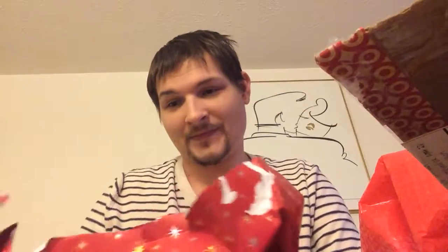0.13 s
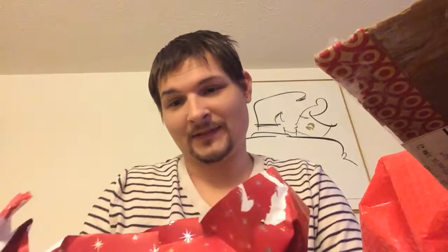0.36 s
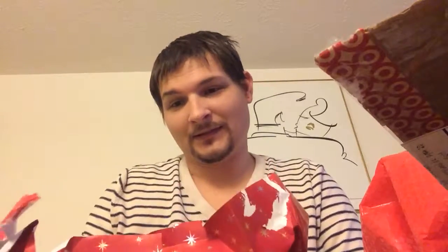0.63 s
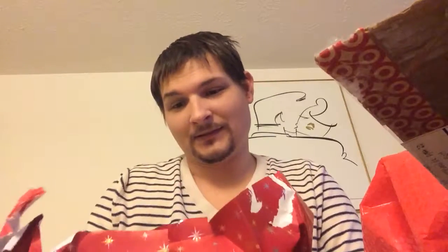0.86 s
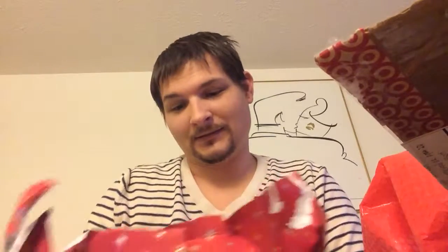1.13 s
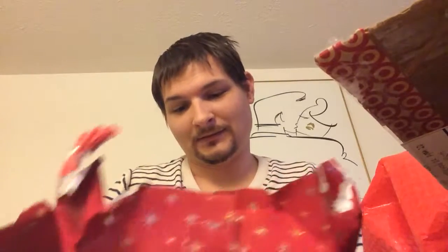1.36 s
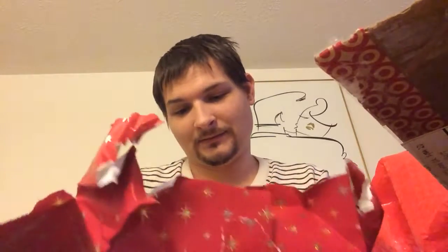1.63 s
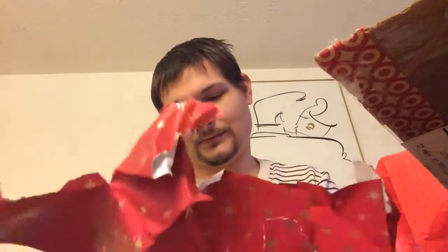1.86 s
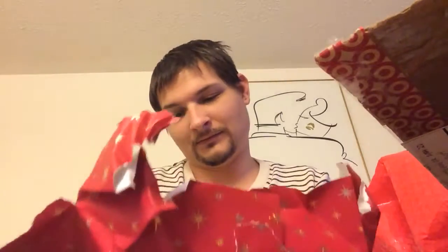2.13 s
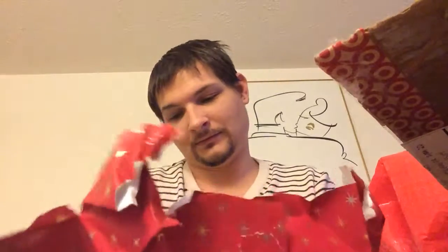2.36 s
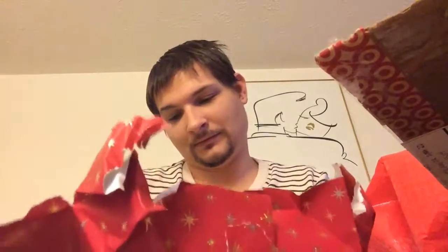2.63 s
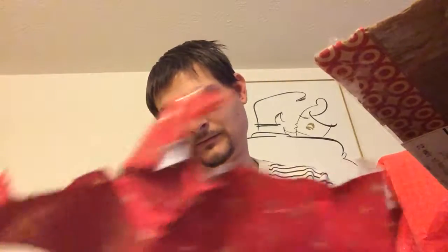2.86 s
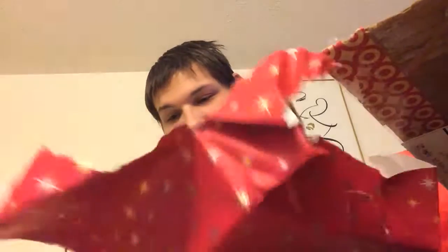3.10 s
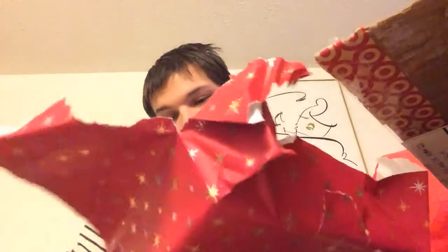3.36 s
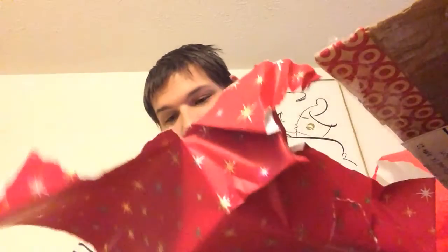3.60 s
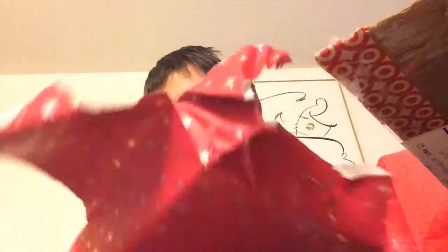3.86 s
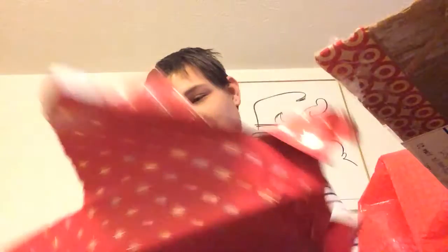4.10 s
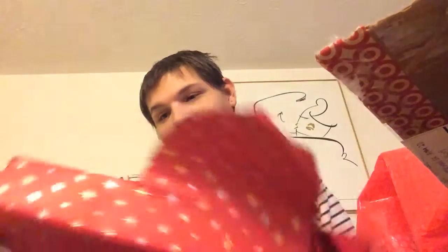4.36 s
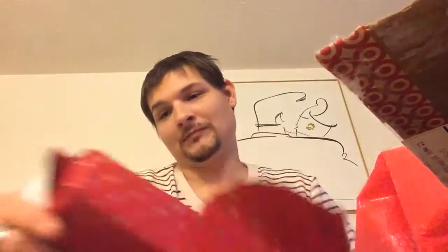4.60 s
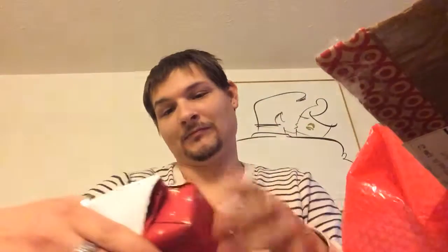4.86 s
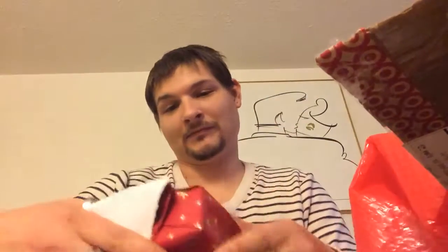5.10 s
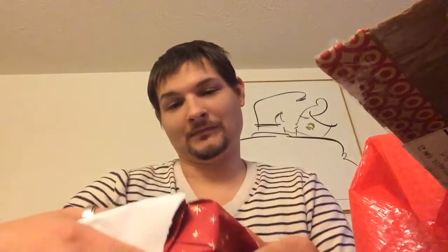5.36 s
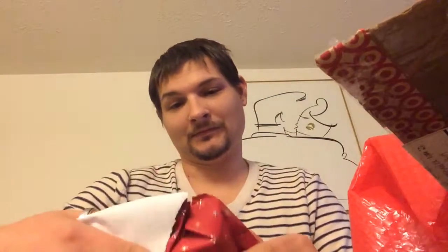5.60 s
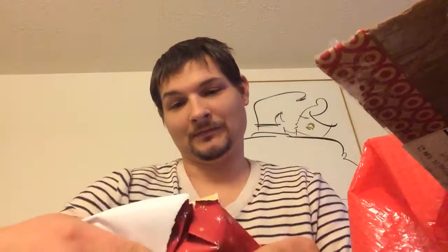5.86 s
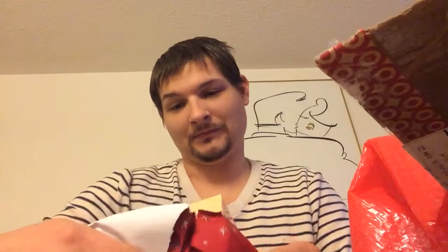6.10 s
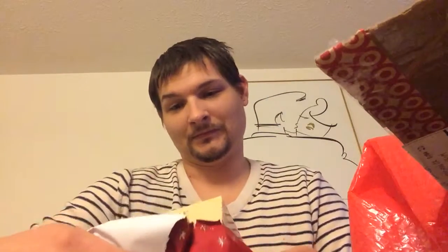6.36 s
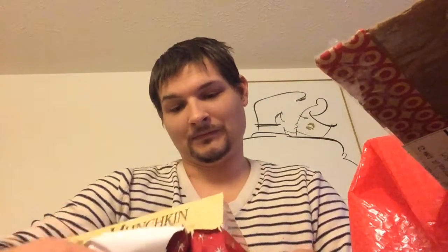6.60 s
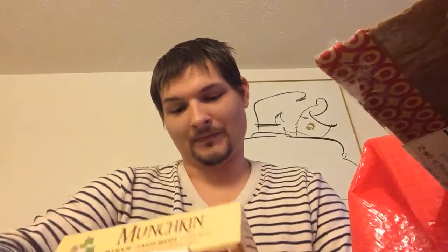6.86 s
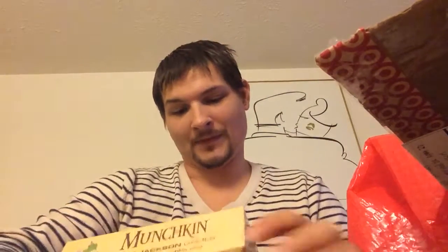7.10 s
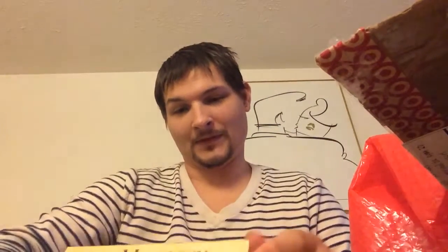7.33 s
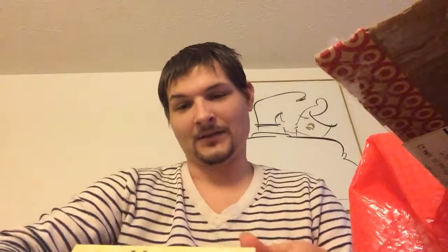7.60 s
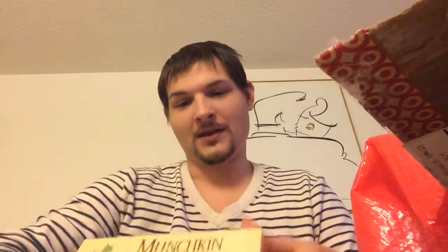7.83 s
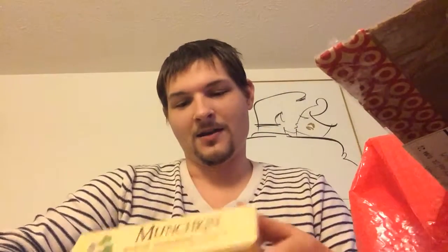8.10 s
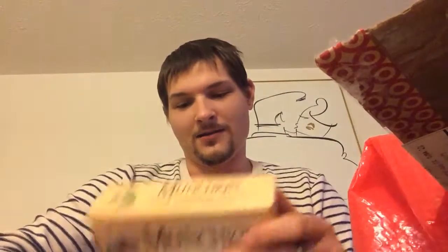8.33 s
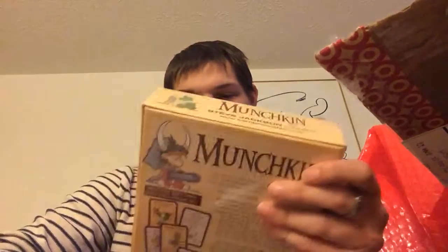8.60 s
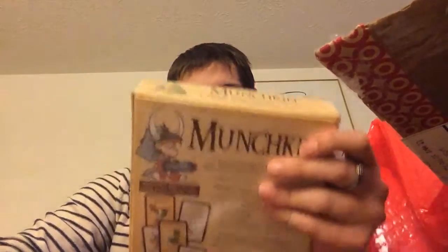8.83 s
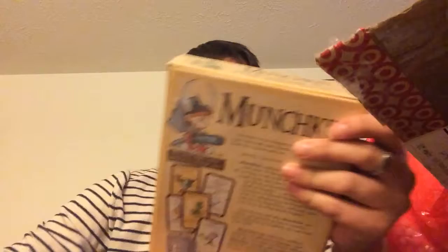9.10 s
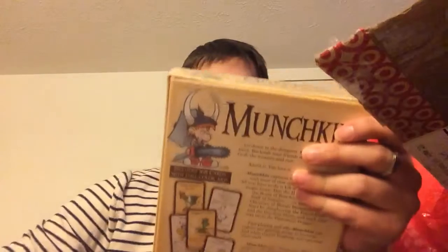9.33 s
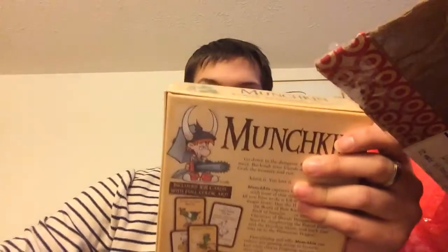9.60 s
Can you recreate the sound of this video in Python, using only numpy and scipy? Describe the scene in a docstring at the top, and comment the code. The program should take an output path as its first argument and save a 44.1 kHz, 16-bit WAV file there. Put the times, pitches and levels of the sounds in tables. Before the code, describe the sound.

Stiff wrapping paper handled right at the microphone, indoors with hardly any echo. Light rubbing on cardboard leads to a bright crack and a fibrous tear, a brief hush, then another tear with a sudden pop. Irregular snaps and crinkles thin out midway and return ever denser, with hollow box taps, a violent cluster of bursting folds, a short dip, and a loud crumpling finish.

```python
"""Hands rip, slide and crumple wrapping paper around a cardboard box, close to a microphone in a small soft room.
From the start a fine rustle of noise puffs, box knocks of a few cycles and small creases; soon slips along the box.
Then creases snap, each a noise crack with a ringing panel; fibres click through two long tears (from 1 and 2.8 s).
From 2.9 s on, flaps puff air and big folds burst as damped pushes; snaps crowd towards the end."""
import sys
import numpy as np
from scipy import signal
from scipy.io import wavfile
from scipy.ndimage import uniform_filter1d

SR = 44100
rng = np.random.default_rng(int(sys.argv[2]) if len(sys.argv) > 2 else 0)


def volts_from_db(level):
    """Convert decibel levels to linear amplitude ratios."""
    exponent = np.asarray(level, float) / 20
    return 10 ** exponent


def wav_out(sig):
    """Save sig, one row per channel (or a flat mono array), as 16-bit PCM at SR to the path in sys.argv[1]."""
    wavfile.write(sys.argv[1], SR, np.round(np.clip(np.atleast_2d(sig).T, -1, 1) * 32767).astype(np.int16))


N = 428211

# Spectrum of paper fibres and cracks. Each row: frequency in Hz, level in dB.
FIBRE_SPECTRUM = [(2500, -8), (3500, -3), (5000, -2), (7800, -2), (8400, -6), (14500, -5), (15400, -12.5),
                  (15750, -51)]


def evened(x):
    """Scales to rms 1."""
    return x / np.sqrt(np.mean(x ** 2) + 1e-20)


def peaked(x):
    """Scales to peak 1."""
    return x / np.abs(x).max()


def smoothed(x, width, axis=-1):
    """Two running means in a row."""
    return uniform_filter1d(uniform_filter1d(x, width, axis), width, axis)


def add(mix, start_s, sound):
    """Mixes a sound in at a time."""
    part = mix[round(start_s * SR):][:len(sound)]
    part += sound[:len(part)]


def mixed(*sounds):
    """Sums sounds of different lengths from their starts."""
    out = np.zeros(max(map(len, sounds)))
    for sound in sounds:
        add(out, 0, sound)
    return out


def colour(points, size=2048):
    """Causal (minimum-phase) impulse response of a spectrum given in Hz and dB."""
    hz, db = np.transpose(points)
    f = np.abs(np.fft.fftfreq(size, 1 / SR)) + 1
    log_gain = np.log(volts_from_db(np.interp(np.log(f), np.log(hz), db)))
    return np.fft.ifft(np.exp(np.conj(signal.hilbert(log_gain)))).real[:size // 2]


def ring(hz, cycles, phase_turns):
    """A mode that swells with a quarter-cycle time constant and falls 60 dB in the given cycles."""
    turns = np.arange(1, 2 + cycles * SR / hz) * hz / SR
    envelope = volts_from_db(-60 * turns / cycles) * (1 - np.exp(-turns / 0.25))
    return envelope * np.sin(2 * np.pi * (turns + phase_turns))


def effort():
    """Levels of fizz, panels and box in dB: every pull rises fast, sags while it lasts and dies away over the bed."""
    # Quiet handling that never stops. Each row: time in s, fibre fizz, paper panels, box and hands in dB.
    bed = [(0, -57, -45, -43.5), (.08, -68, -66, -43.5), (.3, -71.5, -67, -54), (.55, -72, -68, -62.5),
           (.8, -48, -50, -58), (1.768, -44, -51.5, -54.5), (1.95, -84, -72.5, -65),
           (2.65, -59.5, -61, -59), (3.2, -55, -55.5, -52), (3.45, -60.5, -58.5, -63),
           (4.2, -56.5, -57, -51.5), (4.5, -68.5, -63, -61), (4.9, -58.5, -59, -57.5),
           (5.5, -68, -60.5, -56), (6.05, -62, -57.5, -60), (6.55, -63, -55.5, -56.5),
           (7.1, -62, -56.5, -55.5), (8.1, -51, -53, -58), (8.5, -72, -68, -78), (8.8, -60, -54, -58.5),
           (9.2, -48.5, -45, -41.5), (9.71, -51.5, -65, -65)]
    # Pulls of the hands, each a rip, slide or squeeze.
    # Each row: start in s, length in s, fizz, panels and box in dB.
    pulls = [(0.681, 0.054, -29, -37, -36.5), (0.856, 0.24, -42.5, -62, -60), (.975, 0.2, -33, -34.5, -39),
             (1.22, 0.17, -33, -34, -36.5), (1.457, 0.084, -45.5, -42, -41.5),
             (1.614, 0.064, -36.5, -49.5, -56), (1.658, 0.068, -30.5, -36, -39.5),
             (2.406, 0.02, -41, -50, -47), (2.722, 0.11, -34.5, -56, -56),
             (2.828, 0.067, -32.5, -34, -42.5), (2.905, 0.082, -35, -32, -64),
             (3.007, .1, -34.5, -38.5, -48.5), (3.471, 0.22, -52, -48.5, -54),
             (3.837, 0.018, -57, -46, -57), (3.97, 0.18, -49.5, -50, -62), (4.215, 0.063, -49, -54, -63),
             (4.713, 0.1, -55, -52.5, -45.5), (5.01, 0.057, -58, -47.5, -44.5),
             (5.563, 0.047, -44.5, -49.5, -63), (5.664, 0.037, -41, -40, -49),
             (5.775, .04, -44.5, -47.5, -51), (6.058, 0.038, -46.5, -43, -44.5),
             (6.42, 0.019, -56, -49.5, -53), (6.677, 0.17, -54, -39, -39), (6.84, 0.14, -55, -45.5, -46.5),
             (7.212, 0.051, -42, -43, -40.5), (7.303, 0.046, -43, -38, -44), (7.437, 0.1, -55, -50.5, -55),
             (7.558, 0.037, -46, -44, -52), (7.779, 0.047, -45, -40.5, -49),
             (7.878, 0.094, -47, -38.5, -39.5), (8.113, 0.05, -44, -37, -41),
             (8.217, 0.21, -35.5, -40, -42.5), (8.566, 0.025, -61, -49, -73), (8.888, 0.032, -46, -50, -52),
             (9.09, 0.13, -53, -37.5, -40), (9.216, .11, -41.5, -31.5, -31.5),
             (9.369, 0.062, -40, -33.5, -36), (9.482, 0.053, -35, -30, -35.5),
             (9.581, 0.057, -33.5, -28, -32)]
    rise_db_per_s, release_db_per_s = (900, 702.5, 406), (378, 291, 257)  # fizz, panels, box
    sag_db = 4  # over a pull
    t = np.arange(N) / SR
    s, *levels = np.transpose(bed)
    power = np.array([volts_from_db(2 * np.interp(t, s, level)) for level in levels])
    for start, length, *peak_db in pulls:
        now = slice(round(max(start - .1, 0) * SR), round((start + length + .4) * SR))
        u = t[now] - start
        slowing = 1 + 2.3 * max(length - .07, 0)  # long pulls gather more slowly
        rise_db = np.outer(rise_db_per_s, np.minimum(u - .01, 0)) / slowing
        fall_db = np.outer(release_db_per_s, np.maximum(u - length, 0))
        shape_db = rise_db - sag_db * np.clip(u / length, 0, 1) - fall_db
        power[:, now] += volts_from_db(2 * (np.array(peak_db)[:, None] + shape_db))
    return 10 * np.log10(power)


def patchy(x, patch_db):
    """The crumpling sheet keeps changing which pitches it favours."""
    z = signal.stft(x, nperseg=512)[2]
    field = uniform_filter1d(uniform_filter1d(rng.standard_normal(z.shape), 9, 0), 12, 1)
    return signal.istft(z * volts_from_db(patch_db * evened(field)), nperseg=512)[1][:N]


def grains(spectrum, size, t60_s, patch_db=3.5, count=32):
    """Every grain is one of a few short dying noise puffs, so that each has its own colour."""
    t = np.arange(600) / SR
    kind = rng.integers(0, count, N)
    puffs = rng.standard_normal((count, len(t))) * volts_from_db(-60 * t / t60_s)
    x = sum(signal.oaconvolve(size * (kind == k), puffs[k])[:N] for k in range(count))
    x = signal.oaconvolve(x, colour(spectrum))[:N]
    x = patchy(x, patch_db)
    return x / np.sqrt(smoothed(x ** 2, 2500) + 1e-12)  # local rms near 1


def rustle(fizz_db, panel_db, box_db):
    """One clumped stream of tiny buckles drives fibres, panels and box, each adding some chance of its own."""
    # Spectra of loose panels, box and low rumble. Each row: frequency in Hz, level in dB.
    panel_spectrum = [(400, -47), (750, -14.5), (1300, -8.5), (2200, -10.5), (3500, -17.5), (5000, -55)]
    box_spectrum = [(50, -24.5), (110, -5.5), (230, 3), (450, 2.5), (750, -5), (1100, -46.5)]
    rumble_spectrum = [(20, -10), (35, -1.5), (60, -6.5), (120, -3.5), (300, -4.5), (1000, -18.5),
                       (4000, -31), (15000, -47.5), (16000, -75.5)]
    grains_per_s, clump_db = 1700, 3.5  # clump_db at a spread of 4 dB
    spread_db = np.clip(0.15 * (-34 - fizz_db) + 0.36, 0, 3)  # fainter fizz has more uneven grains
    # -1 taut and bright, 1 slack and dull
    slack = np.clip(0.31 + 0.06 * (box_db - panel_db), -1, 1)
    clumps = evened(smoothed(rng.standard_normal(N), 300))
    luck = np.minimum(rng.exponential(1, (3, N)), 5)
    hit = (rng.random(N) < grains_per_s / SR) * volts_from_db(clump_db * clumps * spread_db / 4)

    fizz = grains(FIBRE_SPECTRUM, hit * volts_from_db(spread_db * luck[0]), t60_s=0.007, patch_db=1.2, count=56)
    panel_luck = np.maximum(1.3 * luck[0], 0.29 * luck[1])
    panels = grains(panel_spectrum, hit * volts_from_db(spread_db * panel_luck), t60_s=0.017)
    # an 8-sample echo tilts the colour
    panels = (panels + slack * np.roll(panels, 8)) / np.sqrt(1 + slack ** 2)
    box_luck = np.maximum(0.19 * luck[0], 0.83 * luck[2])
    box = grains(box_spectrum, hit * volts_from_db(spread_db * box_luck), t60_s=0.017)
    rumble = evened(signal.oaconvolve(rng.standard_normal(N), colour(rumble_spectrum, size=8192))[:N])
    rumble_db = -57 + 0.06 * (box_db + 43.5)  # the table under the microphone shakes with the box
    return volts_from_db(fizz_db) * fizz + volts_from_db(panel_db) * panels + volts_from_db(box_db) * box + volts_from_db(rumble_db) * rumble


def crinkles(fizz_db, panel_db):
    """Rows for snaps(): small creases at random moments, as strong as the rustle around them allows."""
    per_s, over_rustle_db, spread_db, low_hz, high_hz = 65, 10.5, 4.5, 1000, 3480
    taut_db = -46.5  # a sheet pulled harder than this crinkles no louder
    when, pick, pitch, tilt, size = rng.random((900, 5)).T
    at = (when * N).astype(int)
    fizz_db, panel_db = np.minimum(fizz_db, taut_db), np.minimum(panel_db, taut_db)
    over_db = over_rustle_db - spread_db * np.log(1 - .99 * size)
    crack_db = fizz_db[at] + over_db - 12 * tilt
    ring_db = panel_db[at] + over_db - 8 * (1 - tilt)
    hz = low_hz * (high_hz / low_hz) ** pitch
    rows = np.transpose([at / SR, crack_db, ring_db, hz])
    return rows[pick < per_s * N / SR / len(when)]


def crack(noise, dull):
    """A spike of a few ms with a short shiver; each crease favours its own treble, dull ones a low part."""
    t = np.arange(len(noise)) / SR
    shape = volts_from_db(-60 * t / 0.0027) + volts_from_db(-11.0 - 60 * t / 0.011)
    favoured_hz, radius = 12500 - 9000 * dull, 0.5
    favour = [1, -2 * radius * np.cos(2 * np.pi * favoured_hz / SR), radius ** 2]
    spike = np.convolve(signal.lfilter([1], favour, noise * shape), colour(FIBRE_SPECTRUM, size=256))
    return peaked(signal.lfilter(*signal.butter(1, 500, "high", fs=SR), spike))  # a thin crease has no bass


def stepped(x, steps):
    """A crease gives way in a few uneven steps: repeats of a sound, later ones weaker, keeping its energy."""
    flip_s, spread_db = 0.004, 8  # flip_s: longest spread of the steps
    late = np.sort(steps[0]) - steps[0].min()
    taps = np.zeros(int(flip_s * SR) + 1)
    taps[(late * steps[1, 0] * flip_s * SR).astype(int)] = volts_from_db(-spread_db * (steps[1] + late))
    y = np.convolve(x, taps)
    return y * np.linalg.norm(x) / np.linalg.norm(y)


def snaps(rows):
    """A crease flips: a sharp crack and a panel ringing with neighbours; nearby creases answer with ticks."""
    count = len(rows)
    out, noise, luck = np.zeros(N), rng.standard_normal((count, 400)), rng.random((count, 6))
    ticks = [crack(n, u) for n, u in zip(rng.standard_normal((40, 400)), rng.random(40))]
    answers, flips = rng.random((count, 6, 3)), rng.random((count, 2, 4))
    for (s, crack_db, panel_db, hz), n, chance, near, steps in zip(rows, noise, luck, answers, flips):
        a, b, c, d, e, dull = chance
        lower = 0.22 * ring(hz * (0.364 + 0.45 * b), 11.0, c)
        upper = 1.19 * ring(hz * (1.326 + 1.04 * d), 7.76, e)
        panel = mixed(ring(hz, 12.5, a), lower, upper)
        panel = signal.lfilter(*signal.butter(2, hz / 3, "high", fs=SR), panel)  # small: radiates no bass
        add(out, s, volts_from_db(crack_db) * stepped(crack(n, dull), steps))
        add(out, s, volts_from_db(panel_db) * stepped(peaked(panel), steps))
        for late, small, kind in near:
            after_s, fall_db = 0.003 + 0.043 * late ** 2.2, -13 - 14 * small - 6 * late
            if kind < .25:  # some give way just before
                after_s = max(-s, -after_s / 3)
            add(out, s + after_s, volts_from_db(crack_db + fall_db) * ticks[int(kind * len(ticks))])
            add(out, s + after_s, volts_from_db(panel_db + fall_db) * ring(hz * (0.71 + 2.0 * kind), 1.6, small))
    return out


def knocks():
    """The hollow box answers with a low push of a few cycles and a brighter edge."""
    # Dull knocks on the box. Each row: time in s, peak level in dB, pitch in Hz.
    box_knocks = [(.023, -28, 223), (.058, -33, 248), (.6132, -35, 230), (.6771, -19, 259),
                  (.7758, -25.5, 240), (.875, -27.5, 550), (.925, -28.5, 215), (.954, -41, 220),
                  (2.2177, -25, 256), (2.295, -35, 276), (2.9577, -22.5, 630), (3.0301, -25, 433),
                  (3.2452, -26.5, 426), (3.5048, -28, 570), (4.7225, -25.5, 187), (4.7506, -18, 457),
                  (5.015, -22, 295), (5.0379, -30, 318), (5.07, -29.5, 317), (5.78, -26, 457),
                  (6.5012, -17, 740), (6.7781, -21, 447), (7.2442, -25, 454), (7.505, -26, 645),
                  (7.9488, -25, 398), (7.9921, -23, 446), (8.063, -25, 666), (8.2791, -14.5, 750),
                  (8.9, -36, 670), (9.0078, -24.5, 209), (9.1046, -11.5, 365), (9.2363, -17.5, 387),
                  (9.2887, -24, 350), (9.3115, -15, 700), (9.3572, -15, 654), (9.4828, -22, 620),
                  (9.497, -19, 272), (9.5142, -20, 536), (9.591, -20.5, 286), (9.6202, -16.5, 430)]
    out, luck = np.zeros(N), rng.random((len(box_knocks), 3))
    for (s, db, hz), (a, b, c) in zip(box_knocks, luck):
        push = ring(hz, 9.1, 0)
        overtone = .5 * ring(hz * (1.8 + 1.0 * a), 14.0, b)
        edge = .45 * ring(hz * (4 + 2.5 * c), 10., 0)  # edge of the cardboard
        add(out, s, volts_from_db(db) * peaked(mixed(push, overtone, edge)))
    return out


def slips():
    """The paper sticks and slips along the box: each slip tugs it inward with a short push and an edge tick."""
    # Slips of the paper. Each row: time in s, peak level in dB.
    paper_slips = [(.078, -34), (0.1003, -31), (.126, -28.5), (.144, -32), (.164, -32), (0.181, -33),
                   (.214, -31), (.256, -27), (0.284, -30), (.332, -36)]
    push, edge_tick = ring(261, 6.2, 0), volts_from_db(-4) * ring(1090, 7.2, 0)
    out, shape = np.zeros(N), peaked(mixed(push, edge_tick))
    for s, db in paper_slips:
        add(out, s, -volts_from_db(db) * shape)
    return out


def tears():
    """Parting fibres click unevenly into wandering resonances of sheet and torn-off flap."""
    # One list of rows per long tear. Each row: time in s, sheet resonance in Hz before its wander, rms in dB.
    long_tears = [
        [(.96, 1290, -50), (.976, 1370, -39), (1.008, 1260, -29), (1.04, 1380, -32.5), (1.108, 1370, -38),
         (1.19, 1600, -39.5), (1.272, 1260, -38), (1.37, 1330, -42), (1.43, 1370, -49)],
        [(2.81, 1740, -50), (2.84, 1750, -38), (2.882, 1500, -38), (2.92, 1700, -43), (2.954, 1950, -39),
         (2.996, 1850, -45), (3.032, 1570, -37), (3.056, 1440, -52), (3.092, 1450, -38), (3.135, 1490, -59)],
    ]
    fibres_per_s, fibre_spread_db, width_hz, wander_share = 800, 4, 470, 0.099
    flap_ratio, flap_db = 0.46, -4  # the flap rings lower than the sheet
    r = np.exp(-np.pi * width_hz / SR)
    out = np.zeros(N)
    for rows in long_tears:
        s, hz, db = np.transpose(rows)
        t = np.arange(s[0], s[-1], 1 / SR)
        hit, size, sign, drift = rng.random((len(t), 4)).T
        fibre_size = volts_from_db(-fibre_spread_db * np.log(1 - .99 * size)) * np.sign(sign - .5)
        fibres = (hit < fibres_per_s / SR) * fibre_size
        wander = 1 + wander_share * evened(smoothed(drift - .5, 900))
        cycles = np.cumsum(np.interp(t, s, hz) * wander) / SR
        turns = np.exp(2j * np.pi * np.outer([1, flap_ratio], cycles))
        # resonate at 0 Hz, then shift back up to the moving pitch
        modes = (turns * signal.lfilter([1], [1, -2 * r, r * r], fibres / turns)).real
        sheet = volts_from_db(np.array([0, flap_db])) @ modes
        add(out, s[0], volts_from_db(np.interp(t, s, db)) * evened(sheet))
    return out


def thumps():
    """Puffs of air from the sheet flapping near the microphone: a low push of 2.5 cycles."""
    # Puffs. Each row: time in s, peak level in dB.
    air_puffs = [(2.891, -39), (7.93, -35.5), (8.245, -27), (8.3153, -24), (8.335, -35), (8.35, -28),
                 (9.004, -42)]
    out, shape = np.zeros(N), peaked(ring(70.4, 2.5, 0))
    for s, db in air_puffs:
        add(out, s, volts_from_db(db) * shape)
    return out


def pops():
    """A big fold bursts open at the microphone: a sudden push of air with a sharp tip and a damped swing back."""
    # Bursting folds. Each row: time in s, peak level in dB.
    fold_bursts = [(2.897, -5), (8.2132, -6.5), (8.2454, -7), (8.3192, 0.5), (8.3344, -6.5), (8.349, -4),
                   (8.3635, -6.5)]
    hz, cycles, spike_s = 550, 3.7, 0.00013
    out, t = np.zeros(N), np.arange(600) / SR
    shape = np.exp(-t / spike_s) + volts_from_db(-60 * t * hz / cycles) * np.cos(2 * np.pi * hz * t)
    for s, db in fold_bursts:
        add(out, s, volts_from_db(db) * peaked(shape))
    return out


def room(x):
    """Sparse reflections of random sign, dying fast and duller than the direct sound."""
    t60_s = 0.11
    at = np.arange(150, SR // 3, 20)
    taps = np.zeros(SR // 3 + 20)
    sign = rng.choice([-1., 1.], len(at))
    taps[at + rng.integers(0, 20, len(at))] = sign * volts_from_db(-60 * at / SR / t60_s)
    taps = signal.lfilter([1], [1, -.3], taps)
    return signal.oaconvolve(x, taps / np.linalg.norm(taps))[:N]


def scene():
    """Paper and box; the separate hits also reflect in the room, the rustle stays dry."""
    # Creases that snap. Each row: time in s, crack level in dB, panel level in dB, panel pitch in Hz.
    big_creases = [(.232, -45, -38, 1880), (.5887, -31, -31, 3480), (.6671, -4, -8, 1510),
                   (.6754, -6.5, -26, 1020), (.8307, -28, -18, 2500), (.8604, -13, -13, 2740),
                   (.966, -40, -26, 1150), (.978, -25, -26, 1420), (1.182, -40, -25, 2030),
                   (1.6656, -20, -24, 780), (1.849, -32, -37, 1150), (2.2146, -47, -29, 843),
                   (2.4128, -23.5, -32, 2430), (2.6142, -33, -35, 2980), (2.7341, -18.5, -24.5, 1450),
                   (2.742, -38, -28, 1600), (2.7615, -12, -19, 2840), (2.846, -20, -22, 1900),
                   (2.863, -9, -11.5, 2310), (2.8957, -11, -14.5, 800), (2.9403, -36, -16, 2000),
                   (3.072, -15.5, -27, 1400), (3.084, -37, -32, 2900), (3.095, -25, -19, 1370),
                   (3.125, -25, -28, 1500), (3.2418, -19, -20, 1430), (3.277, -23.5, -34, 2270),
                   (3.465, -26.5, -37, 2240), (3.499, -21, -23, 1690), (3.5044, -13.5, -16, 1790),
                   (3.517, -32, -33, 1660), (3.558, -37, -33, 2000), (3.58, -32, -42, 2400),
                   (3.618, -41, -36, 1700), (3.6802, -34, -30.5, 1230), (3.768, -33, -36, 2200),
                   (3.78, -32, -29.5, 2100), (3.8322, -18, -23, 2750), (3.838, -19.5, -30, 2400),
                   (3.852, -35, -26.5, 2000), (3.9285, -32, -20, 1740), (3.9604, -13, -25, 1060),
                   (3.974, -38, -34, 1380), (4.0054, -20, -13.5, 2010), (4.0125, -24, -22, 2920),
                   (4.0982, -16, -20, 2530), (4.112, -28, -27, 1990), (4.1953, -28.5, -45, 3400),
                   (4.24, -45, -31.5, 2000), (4.58, -47, -38, 900), (4.624, -44, -34, 1470),
                   (4.699, -46, -33, 1540), (4.766, -52, -22, 960), (5.014, -35, -20, 1000),
                   (5.205, -46, -39, 1640), (5.2531, -32, -35, 1600), (5.487, -51, -34, 1600),
                   (5.543, -34, -18, 1530), (5.5743, -11, -32, 775), (5.6751, -4.5, -12.5, 1350),
                   (5.7065, -16.5, -19.5, 2500), (5.7779, -7, -19.5, 1450), (5.7849, -6.5, -24, 3120),
                   (5.8834, -43, -30.5, 2060), (5.9198, -27.5, -25, 1760), (6.0187, -33, -31, 950),
                   (6.0722, -18, -16.5, 1470), (6.1047, -9.5, -12.5, 2310), (6.1435, -8.5, -19.5, 1340),
                   (6.1506, -38, -15, 2600), (6.179, -45, -25.5, 1110), (6.2074, -18.5, -28, 1600),
                   (6.3141, -19.5, -17, 2560), (6.3249, -40, -21, 2300), (6.449, -28, -31, 1600),
                   (6.4617, -13, -18.5, 2000), (6.5016, -33, -18, 1650), (6.6662, -19.5, -22.5, 2080),
                   (6.7152, -15, -25, 1500), (6.7233, -19, -15, 1770), (6.803, -48, -37, 1630),
                   (6.844, -41, -23, 1410), (6.867, -12, -17.5, 1900), (6.898, -38, -26, 1000),
                   (6.9193, -16.5, -15.5, 1510), (6.9474, -16, -17, 1810), (6.9795, -29, -22, 2000),
                   (7.06, -53, -33, 1450), (7.1405, -17, -16, 1920), (7.1875, -27, -26.5, 1030),
                   (7.1975, -18.5, -25, 1920), (7.2287, -34, -24, 1120), (7.2474, -18, -20.5, 1080),
                   (7.3087, -28, -18, 2350), (7.3689, -22, -24, 1800), (7.4566, -21, -22, 2450),
                   (7.5175, -20.5, -19, 2030), (7.591, -20, -18, 1970), (7.6092, -14, -14.5, 1830),
                   (7.62, -26, -27, 1700), (7.681, -35, -36, 1470), (7.787, -28, -27, 1460),
                   (7.868, -41, -20.5, 2700), (7.9291, -8, -17, 1390), (7.9965, -18, -11.5, 2860),
                   (8.062, -32, -20.5, 2300), (8.121, -40, -20.5, 1380), (8.1771, -15.5, -22, 2020),
                   (8.2135, 0, -21, 740), (8.2236, -8, -16.5, 1000), (8.2452, -4.5, -20, 720),
                   (8.2792, -7.5, -11, 740), (8.3036, -11, -43, 910), (8.3193, -15, -20, 1000),
                   (8.3345, -13, -20, 1420), (8.3484, -7.5, -14, 1400), (8.3608, -6, -10, 1730),
                   (8.4036, -14, -31, 1090), (8.4226, -12.5, -22, 1940), (8.5609, -24.5, -18.5, 1890),
                   (8.66, -36, -26, 2940), (8.8361, -36, -18, 2450), (8.9, -12.5, -15, 1170),
                   (8.911, -27, -23.5, 1070), (8.9648, -16.5, -14.5, 1460), (8.983, -37, -25, 1340),
                   (9.0081, -16, -25, 800), (9.1064, -11.5, -16, 834), (9.2171, -22.5, -11, 1000),
                   (9.2704, -33, -15.5, 1330), (9.2891, -8.5, -3, 1560), (9.3573, -42, -14, 1260),
                   (9.395, -22, -16, 1380), (9.403, -12.5, -14.5, 1500), (9.485, -25, -20, 1910),
                   (9.5023, -12.5, -16.5, 890), (9.5148, -18, -15, 1160), (9.5823, -32, -16.5, 910),
                   (9.5948, -10.5, -15.5, 1590), (9.6137, -10.5, -10.5, 1460), (9.6492, -6, -14.5, 1020)]
    fizz_db, panel_db, box_db = effort()
    creases = snaps(crinkles(fizz_db, panel_db)) + snaps(big_creases)
    hits = creases + knocks() + slips() + tears() + thumps() + pops()
    return (hits + volts_from_db(-14.5) * room(hits) + rustle(fizz_db, panel_db, box_db))[None]


def top_cut(x):
    """Nothing passes above the cut-off."""
    return signal.sosfilt(signal.butter(12, 16500, fs=SR, output="sos"), x)


def record(dry):
    """The microphone drops the deepest bass; the loudest snaps meet a soft ceiling."""
    low_hz, ceiling = 54, 0.73
    mic = signal.sosfilt(signal.butter(2, low_hz, "highpass", fs=SR, output="sos"), dry)
    mix = mic / (1 + (mic / ceiling) ** 6) ** (1 / 6)
    return top_cut(mix)


dry = scene()
out = record(dry)
wav_out(out)
```